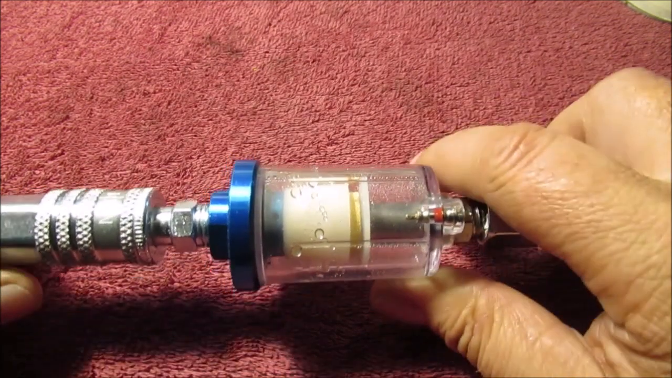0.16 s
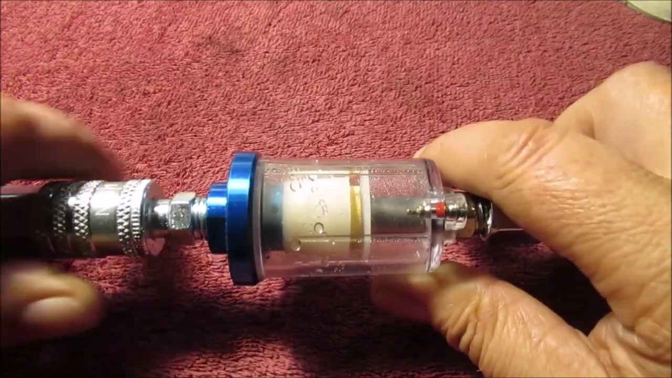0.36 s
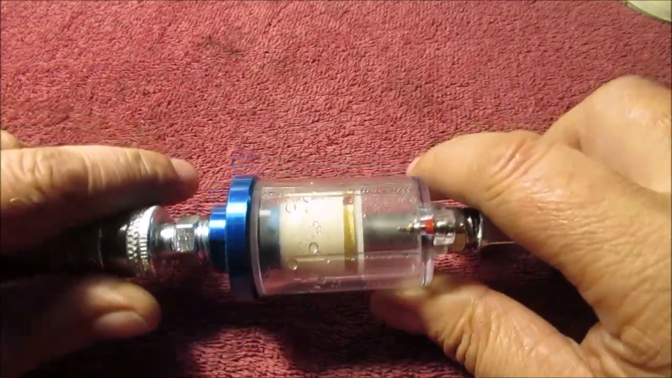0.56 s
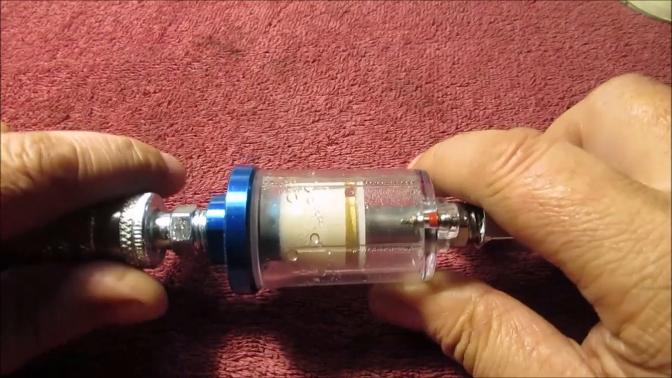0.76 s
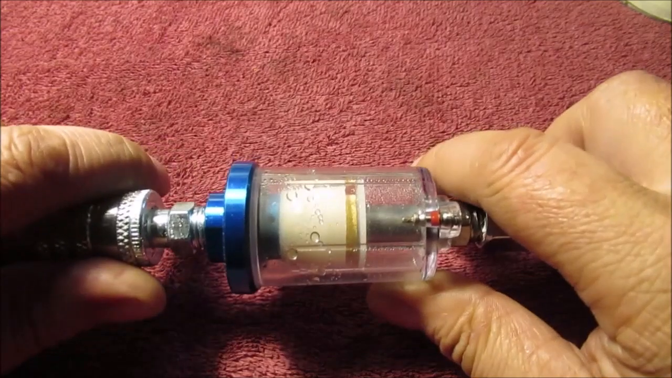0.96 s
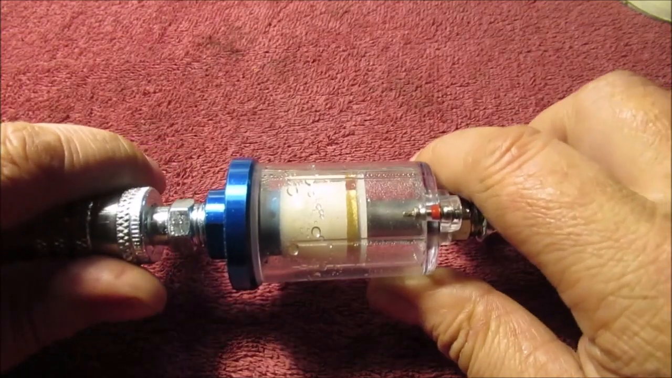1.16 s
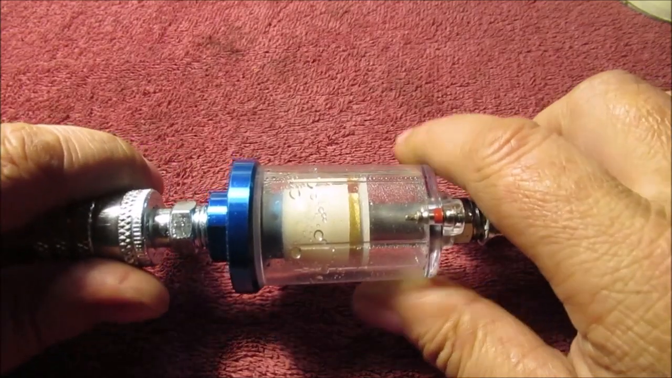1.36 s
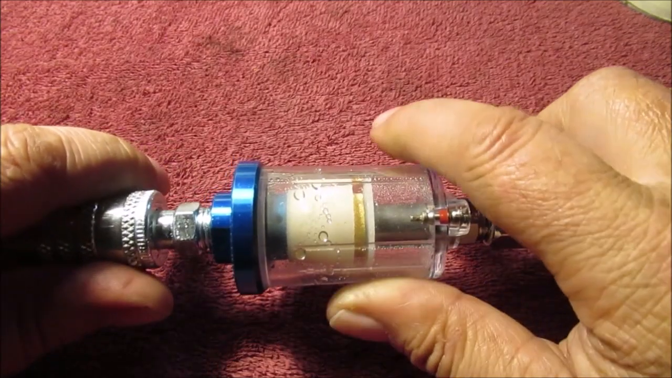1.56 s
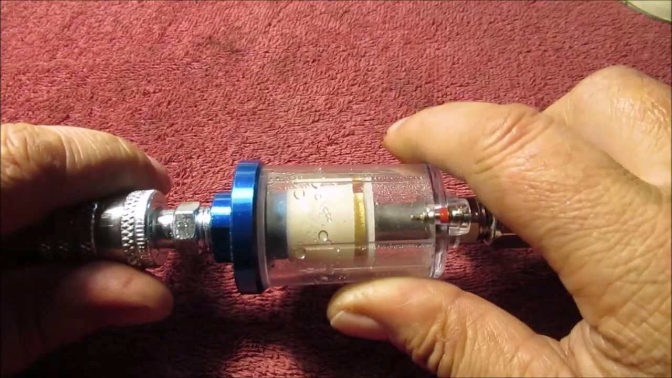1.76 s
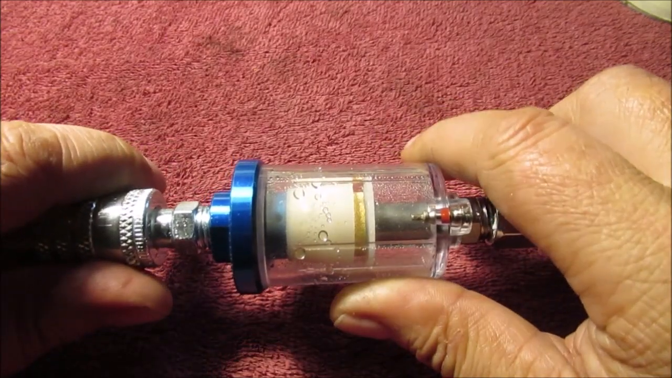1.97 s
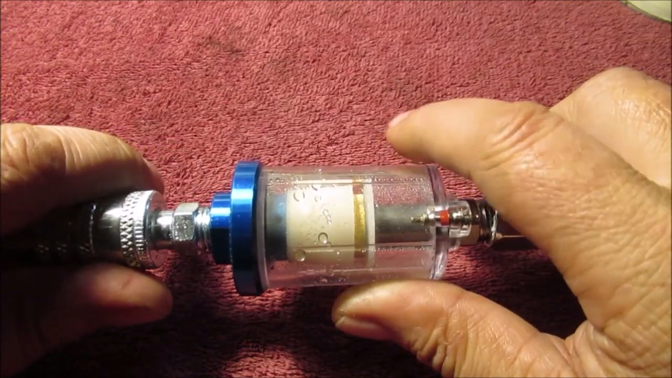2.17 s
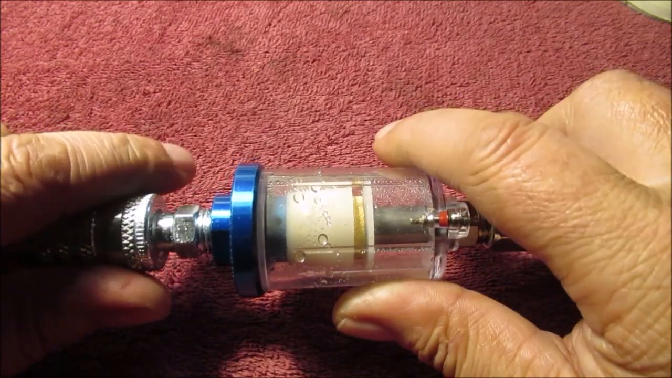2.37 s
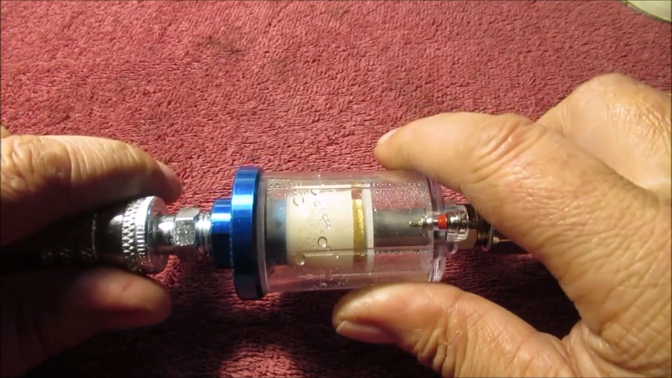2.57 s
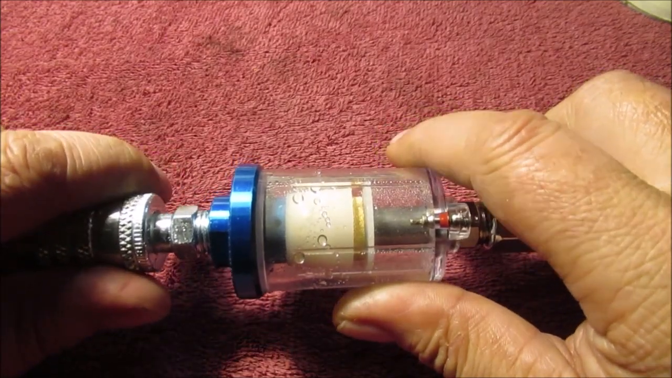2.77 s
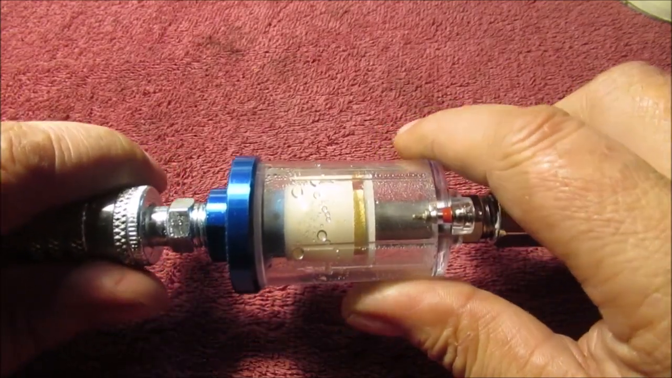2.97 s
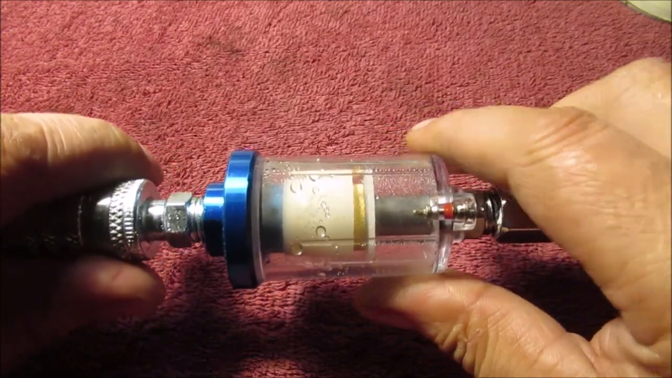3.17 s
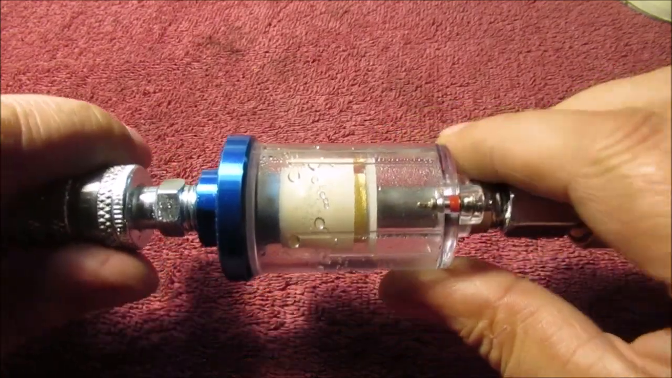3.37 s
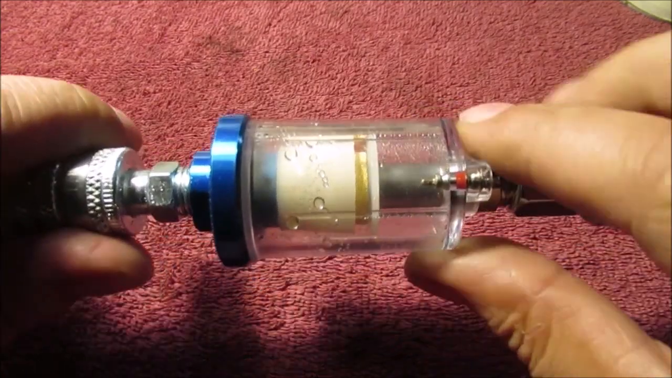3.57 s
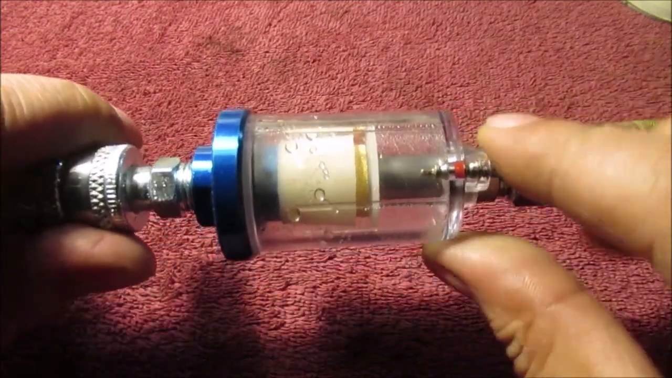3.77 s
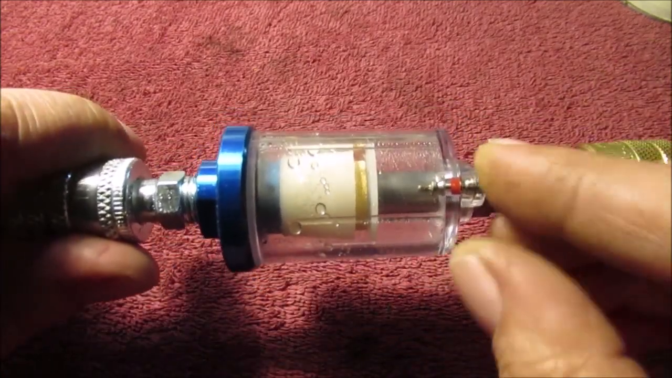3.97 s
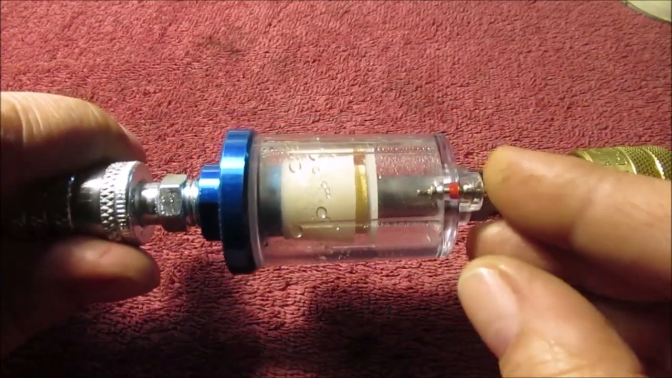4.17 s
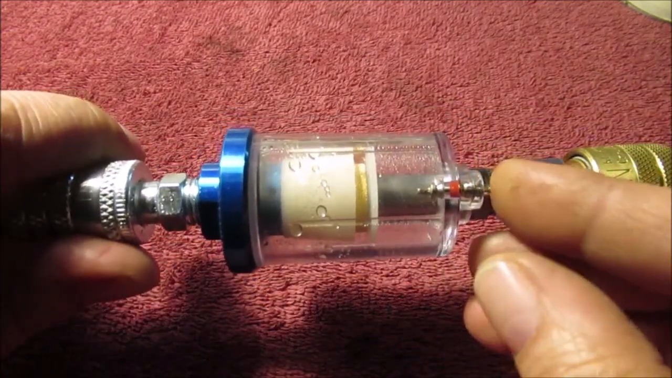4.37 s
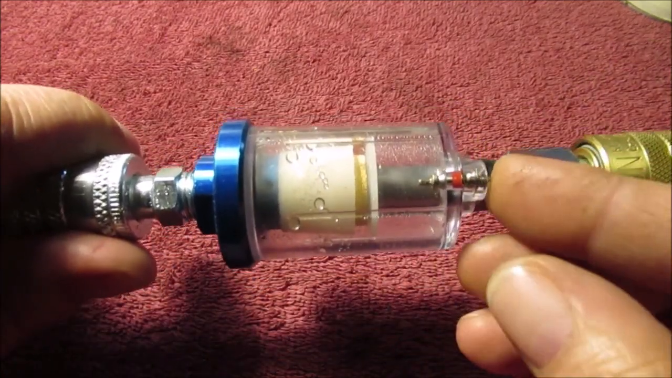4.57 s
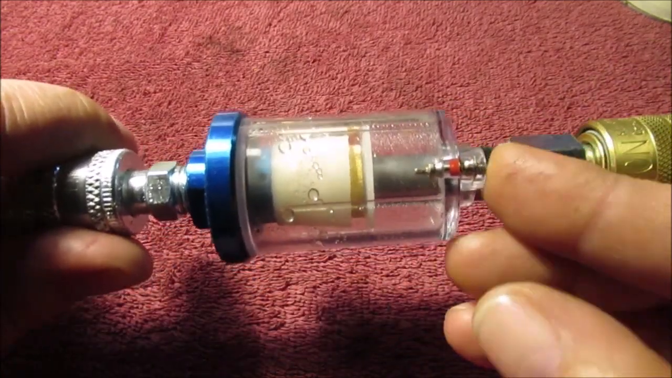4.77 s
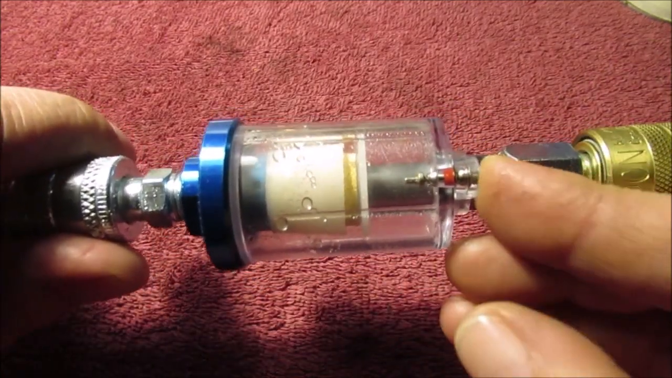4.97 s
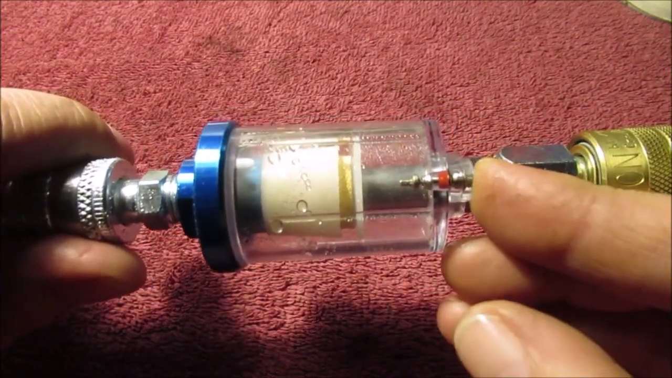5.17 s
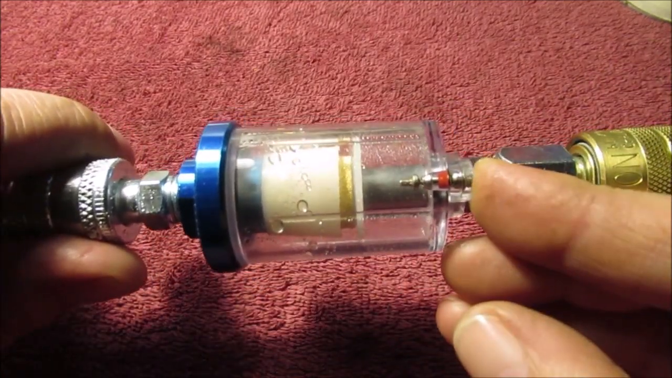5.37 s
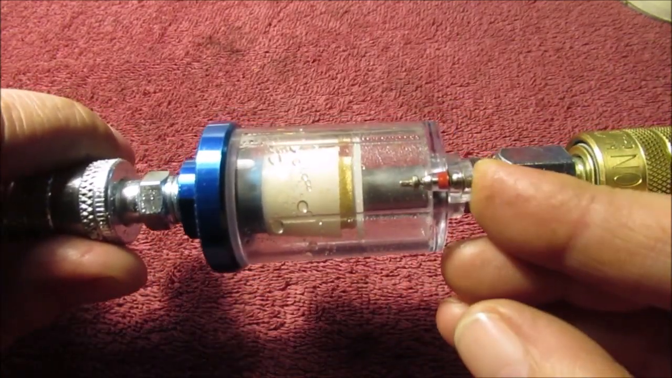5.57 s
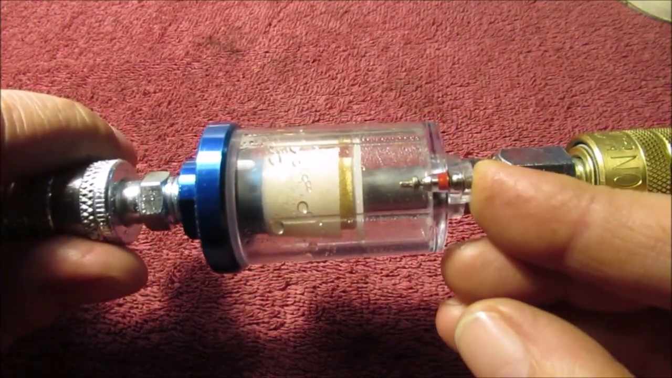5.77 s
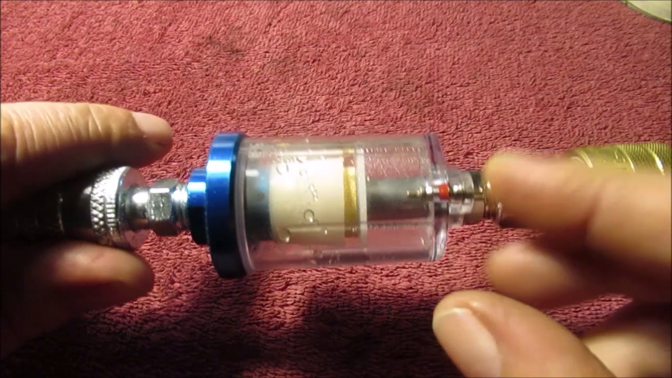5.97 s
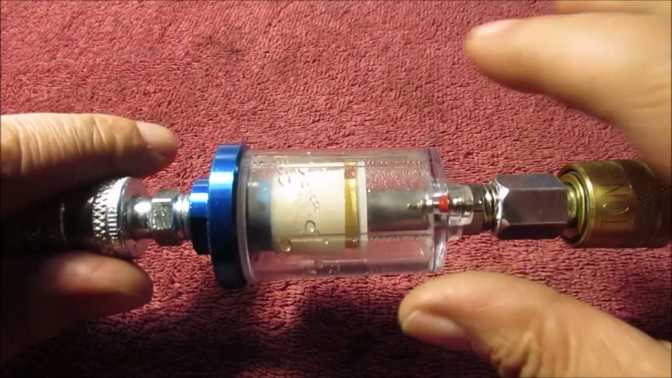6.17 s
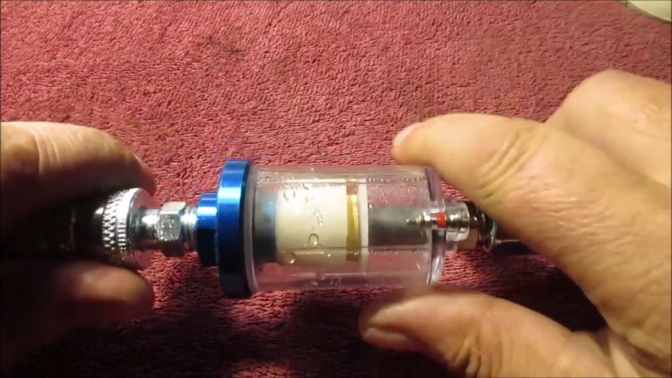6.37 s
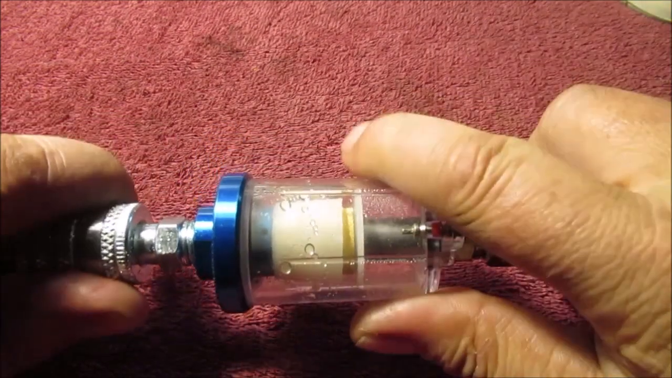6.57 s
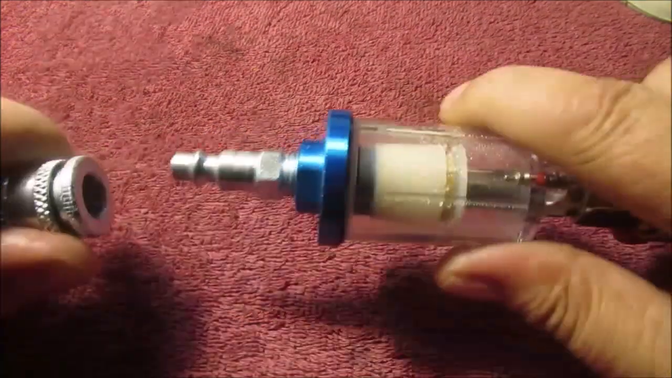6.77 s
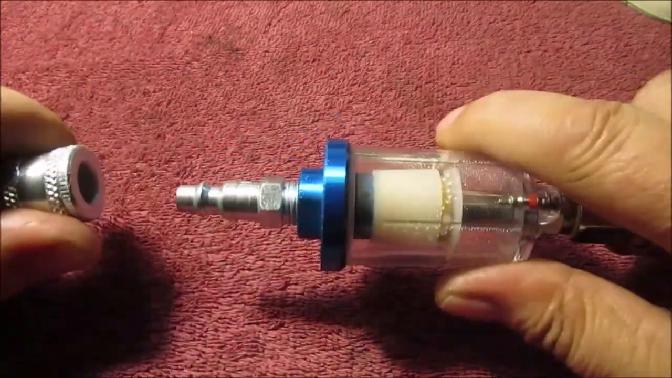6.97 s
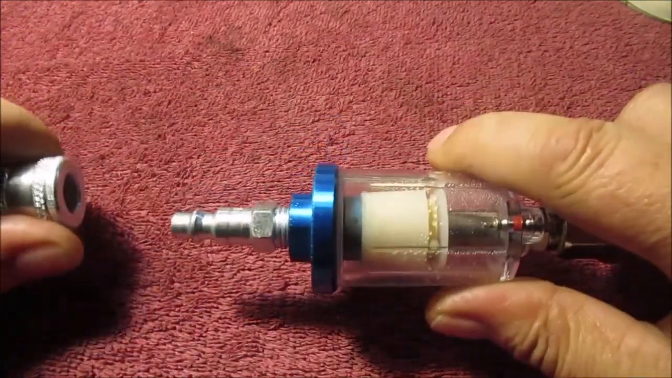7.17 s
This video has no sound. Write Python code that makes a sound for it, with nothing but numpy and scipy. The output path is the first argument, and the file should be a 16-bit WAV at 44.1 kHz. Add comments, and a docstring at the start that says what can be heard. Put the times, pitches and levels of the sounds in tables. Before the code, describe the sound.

Over a running workshop compressor, two loud close blasts of air: a sputtering valve hiss, then a coupling popping loose with a rush.

```python
"""Workshop compressor and two air blasts

A small piston compressor drones on: knocking strokes, gulps of air, a slapping reed valve, a rattling shroud.
Up close, a finger holds an air-line filter's drain open for a second and it spits air and water; then the
hose coupling pops off and air rushes out. The camera's gain control ducks under each blast and creeps back.
Now and then the hiss breaks off for an instant, and thin tones and chirps ring in the gap."""
import sys
import numpy as np
from scipy import signal
from scipy.fft import rfft, irfft
from scipy.io import wavfile
from scipy.ndimage import uniform_filter1d

SR = 44100
rng = np.random.default_rng(int(sys.argv[2]) if len(sys.argv) > 2 else 0)


def unload_wav(signal):
    """Save mono or channel-first audio to the path in sys.argv[1] as 16-bit WAV at rate SR, clipped to [-1, 1]."""
    wavfile.write(
        sys.argv[1],
        SR,
        np.round(np.clip(np.atleast_2d(signal).T, -1, 1) * 32767).astype(np.int16),
    )


N = 318843
T = np.arange(N) / SR
FREQS = np.maximum(np.fft.rfftfreq(N, 1 / SR), 1)


def undb(db):
    """Decibels to gain."""
    return 10 ** (np.asarray(db) / 20)


def unit(x):
    """Scale to rms 1."""
    return x / np.sqrt(np.mean(x ** 2))


def walk(rate):
    """A smooth random wobble of rms 1 that moves about rate times a second."""
    step = max(int(SR / rate), 2)
    held = np.repeat(rng.standard_normal(N // step + 1), step)
    return unit(uniform_filter1d(uniform_filter1d(held, step), step)[:N])


def noise(colour):
    """Noise of rms 1, shaped by (frequency [Hz], level [dB]) points."""
    hz, db = np.transpose(colour)
    curve = undb(np.interp(np.log(FREQS), np.log(hz), db))
    return unit(irfft(rfft(rng.standard_normal(N)) * curve, N))


def resonate(x, modes):
    """Ring a bank of (frequency [Hz], width [Hz], level [dB]) resonances; the result has rms 1."""
    response = sum(undb(db) / (1 + 1j * (FREQS ** 2 - hz ** 2) / (FREQS * width))
                   for hz, width, db in modes)
    return unit(irfft(rfft(x) * response, N))


def bump(s, length, t=T):
    """A flat-topped swell from 0 to 1 and back, centred on s."""
    return np.exp(-np.square(np.square(2 * (t - s) / length)))


def swells(rows):
    """A level ride in dB, summed from (time [s], length [s], level [dB]) swells."""
    return sum(db * bump(s, length) for s, length, db in rows)


def walls(x, echo_db, decay_s):
    """Dense reflections off bench and walls give noise a fine, slightly metallic grain."""
    age = np.arange(SR // 5) / SR
    tail = rng.standard_normal(len(age)) * np.exp(-age / decay_s)
    echoes = signal.fftconvolve(x, tail / np.linalg.norm(tail))[:N]
    return unit(x + undb(echo_db) * echoes)


def intake(turns):
    """The pump gulps air once a turn: a pulsing breath, reflected around the room."""
    # colour of the intake air and pump rattle: (frequency [Hz], relative level [dB])
    colour = [(25, -34), (70, -15.5), (140, -9), (240, 1), (290, -0.5), (420, -1), (850, -2), (1100, -8),
              (1550, -8.5), (2200, -14), (2700, -14), (3300, -17), (4300, -18.5), (5300, -21), (7500, -22),
              (9500, -25.5), (15000, -31)]
    gulp = (1 + .15 * np.cos(2 * np.pi * (turns - .15))) * undb(.7 * walk(27))
    return walls(noise(colour), echo_db=-10.5, decay_s=0.019) * gulp


def shroud(turns, decay_turns=0.96):
    """A clack on every turn, over a steady rattle, rings the cylinder head and shroud."""
    # rings of the metal: (frequency [Hz], width [Hz], relative level [dB])
    modes = [(2375, 37, 0), (2630, 400, -4), (3390, 76, -5), (4380, 60, -3), (4560, 87, -4), (4830, 97, -9),
             (5630, 54, -4.5), (6860, 70, -8), (7700, 70, -7), (8320, 110, -11), (9400, 50, -19),
             (13400, 450, -16), (14000, 50, -14)]
    clacks = (1 + np.exp(-(turns % 1) / decay_turns)) * rng.standard_normal(N)
    return resonate(clacks, modes)


def piston(turns, scatter=0.11, dispersion=.003, waver_db=0.88, jitter_turns=0.00054):
    """Each turn sends the same knocks through the casing; the walls scatter and sway their partials."""
    # tone of a stroke through the casing: (multiple of the stroke rate, relative level [dB])
    partials = [(1, -27), (2, -8.5), (3, -0.3), (4, -6.5), (5, -8.5), (6, -5.5), (7, -3), (8, -12),
                (9, 3.5), (10, -7), (11, 3.5), (12, -15.5), (13, -13), (14, -5), (15, -13.5), (16, 1),
                (17, -6.5), (18, -16), (19, -26), (20, -16), (21, -20.5), (22, -11.5), (23, -26), (24, -20),
                (25, -20), (26, -14), (27, -33), (28, -14.5), (29, -15.5), (30, -29), (31, -36), (32, -21),
                (33, -30), (34, -13.5), (35, -36), (36, -28), (37, -19), (38, -44), (39, -29.5), (40, -43),
                (41, -17.5), (42, -29), (43, -22.5), (44, -33), (45, -33), (46, -25), (47, -27)]
    # knocks of piston and valves, which set each partial's phase: (position [turns], signed pressure)
    knocks = [(0, -1), (.093, .9), (.283, -.55), (.373, -.49)]
    # one partial swells or fades: (time [s], length [s], multiple of the stroke rate, change [dB])
    wavers = [(1.25, 0.7, 6, -22), (1.5, 1.2, 7, 3), (2.044, 0.34, 6, 2.5), (3.5, 2, 3, 1.5),
              (1.762, 1.67, 5, 7.5), (1.8, 1, 3, -0.5), (2.39, 0.27, 6, -19), (3.5, 1.8, 5, -9),
              (4.0, 2.2, 12, -5.5), (6.349, 0.98, 6, -10), (6.4, 1.5, 5, 6), (6.399, 1.2, 7, 4)]
    turns = turns + jitter_turns * walk(58)  # no two strokes are quite the same length
    tone = 0
    for k, partial_db in partials:
        knock_phase = np.angle(sum(push * np.exp(-2j * np.pi * k * at) for at, push in knocks))
        lag = dispersion * k ** 2  # high partials arrive later and smear each knock
        stray = scatter * (k / 10) ** 2 * rng.standard_normal()  # short waves scatter most
        phase = 2 * np.pi * k * turns + knock_phase - lag + stray
        swell_db = swells((s, length, db) for s, length, multiple, db in wavers if multiple == k)
        tone = tone + undb(partial_db + swell_db + waver_db * walk(16)) * np.cos(phase)
    return unit(tone)


def reed_slaps(turns, uneven_db=3, late_turns=0.048):
    """The reed valve slaps shut just after each turn's main knock, never twice with the same force."""
    # ring of the reed: (frequency [Hz], width [Hz], relative level [dB])
    modes = [(2610, 590, 0), (4450, 900, -15)]
    shuts = np.diff(np.floor(turns - late_turns), prepend=-1) > 0
    slaps = shuts * undb(uneven_db * walk(58))
    return resonate(resonate(slaps, modes), modes)


def compressor(stroke_hz=57.8, wander=0.000983, level_db=-14.5):
    """The drone: one speed and one load, with air and rattle tucked under the piston tone."""
    turns = np.cumsum(stroke_hz * (1 + wander * walk(4))) / SR
    breath = undb(-11.5) * intake(turns)
    rattle = undb(-23) * shroud(turns)
    tone = piston(turns)
    uneven_db = .5 * walk(40)
    slaps = undb(-28.5) * reed_slaps(turns)
    return (tone + breath + rattle + slaps) * undb(level_db + uneven_db)


def thin_tones(s, length, t, count=7, low_hz=4800, top_hz=14800, outlast_s=.01, stagger_s=.004):
    """A handful of unrelated high tones around one gap, each coming and going at its own moment."""
    place, phase, stagger = rng.random((count, 3)).T
    pitches = low_hz * (top_hz / low_hz) ** ((np.arange(count) + place) / count)
    swell = bump(s + stagger_s * (2 * stagger - 1), length + outlast_s, t[:, None])
    tones = np.sin(2 * np.pi * (np.outer(t, pitches) + phase))
    return (swell * tones).sum(axis=1) * np.sqrt(2 / count)


def hiss_gaps(x, shoulder_db=-3.5, shoulder_s=.016):
    """The hiss drops out for an instant inside a wider, shallow sag; thin tones ring through the gap."""
    # gaps: (time [s], length [s], depth [dB], lower edge [Hz], tones relative to the hiss [dB])
    gaps = [(0.563, .007, -10, 2800, -16), (1.034, .009, -18, 2800, -20), (1.161, .009, -11, 2800, -16),
            (1.439, .009, -18, 2400, -20), (1.545, .044, -38, 2000, -30), (1.77, .024, -35, 2600, -30),
            (1.866, .007, -11, 2600, -18), (2.015, .012, -9, 1800, -10), (2.428, .025, -35, 1700, -28),
            (2.569, .007, -13, 2600, -16), (2.633, .007, -10, 2600, -16), (3.014, .024, -28, 1800, -18),
            (3.06, .007, -12, 2600, -16), (4.255, .007, -15, 2300, -20), (4.362, .007, -15, 2300, -12),
            (4.53, .006, -11, 2600, -16), (4.642, .007, -11, 2400, -14), (4.982, .006, -2, 3000, -2),
            (5.153, .011, -14, 700, -8), (5.291, .025, -30, 500, -9), (5.396, .024, -32, 600, -13),
            (5.47, .009, -13, 40, -8), (5.589, .021, -27, 100, -6), (5.662, .009, -13, 40, -7),
            (6.089, .01, -10, 2400, -30), (6.342, .007, -12, 2400, -20), (6.815, .008, -13, 150, -5),
            (6.859, .009, -13, 150, -6), (6.922, .009, -13, 150, -7), (7.0105, .005, -9, 150, -20)]
    out, reach = x.copy(), SR // 16
    for s, length, depth_db, hz, tones_db in gaps:
        near = slice(int(s * SR) - reach, int(s * SR) + reach)
        t = T[near]
        hiss = signal.sosfiltfilt(signal.butter(3, hz, "high", fs=SR, output="sos"), out[near])
        gap_db = depth_db * bump(s, length, t) + shoulder_db * bump(s, length + shoulder_s, t)
        tones = thin_tones(s, length, t) * np.std(hiss) * undb(tones_db)
        out[near] += hiss * (undb(gap_db) - 1) + tones
    return out


def chirps():
    """Short, steady-pitched blips stand out where the hiss breaks off."""
    # blips: (time [s], length [s], pitch [Hz], peak level [dB])
    blips = [(1.545, .05, 2363, -38), (1.552, .042, 3278, -37), (3.014, .03, 2659, -37),
             (5.292, .04, 436, -26), (5.297, .03, 1800, -27), (5.294, .03, 3036, -29),
             (5.392, .03, 785, -28), (5.399, .036, 2239, -28), (5.394, .028, 1862, -28),
             (5.47, .022, 1378, -24), (5.592, .036, 516, -26), (5.59, .028, 1227, -29),
             (5.582, .036, 2120, -28), (5.595, .032, 3316, -29), (6.815, .032, 1006, -23),
             (6.813, .026, 2912, -26), (6.858, .03, 1200, -22), (6.858, .024, 3294, -25),
             (6.922, .03, 931, -25)]
    out, reach = np.zeros(N), SR // 16
    for s, length, hz, db in blips:
        near = slice(int(s * SR) - reach, int(s * SR) + reach)
        tone = np.sin(2 * np.pi * (hz * T[near] + rng.random()))
        out[near] += undb(db) * bump(s, length, T[near]) * tone
    return out


def jet(hiss_colour, rumble_colour, rumble_db, flutter_db, eddy_db):
    """Air shears out of a narrow opening as hiss; larger eddies tumble beneath it."""
    hiss = noise(hiss_colour) * undb(flutter_db * walk(70))
    rumble = noise(rumble_colour) * undb(rumble_db + eddy_db * walk(90))
    return hiss + rumble


def opening(age, attack_s):
    """The flow builds from 0 to 1 as a port opens."""
    return np.square(1 - np.exp(-age / attack_s))


def shutting(s, cut_s=0.0042, tail_db=-7.5, tail_s=0.018):
    """The flow is cut off and leaves a short tail."""
    since = np.maximum(T - s, 0)
    return np.maximum(np.exp(-since / cut_s), undb(tail_db) * np.exp(-since / tail_s))


def drain(opens_s=4.973, shuts_s=6.016, level_db=3.0, calm_db_per_s=7, sag_db_per_s=0.4):
    """The held drain blows as the pressure sags; its rumble spurts, then calms as the water clears."""
    # colours of the jet's hiss and rumble: (frequency [Hz], relative level [dB])
    hiss_colour = [(30, -18), (200, -7.5), (900, -2.5), (2000, -3), (3000, -4.5), (4300, -7), (6000, -4.5),
                   (8200, -4.5), (10500, -5), (13500, -4), (15000, -9.5)]
    rumble_colour = [(25, -21), (70, -2), (170, -0.5), (400, 0), (700, -7), (1500, -20), (4000, -26)]
    # slugs of water burble out: (time [s], length [s], rumble lift [dB])
    spurts = [(5.0, 0.02, 5), (5.165, 0.048, 6), (5.31, 0.041, 3.5), (5.44, 0.03, 4), (5.545, 0.022, 8),
              (5.625, 0.03, 4)]
    age = np.maximum(T - opens_s, 0)
    rumble_db = -13.5 - calm_db_per_s * age + swells(spurts)
    air = jet(hiss_colour, rumble_colour, rumble_db, flutter_db=1.42, eddy_db=4.0)
    flow = opening(age, attack_s=0.007) * shutting(shuts_s)
    return air * undb(level_db - sag_db_per_s * age) * flow


def pops():
    """A seal lets go or a drop is spat out: a burst of pressure a few milliseconds long."""
    # pops and spits of the valves: (time [s], level [dB], pitch [Hz], decay [s])
    hits = [(4.973, -16, 900, 0.0011), (4.979, -1, 2500, 0.0016), (4.9817, 9, 6400, 0.00088),
            (4.9874, 5, 1690, 0.0018), (5.544, 4, 503, 0.0025), (5.99, 10, 1400, 0.001),
            (5.991, 11, 450, 0.0019), (6.758, -6, 500, 0.0019), (6.768, 3, 7060, 0.0012),
            (6.769, 7.5, 259, 0.0024), (6.7714, 12, 1290, 0.00091)]
    out = np.zeros(N)
    age = np.arange(SR // 20) / SR
    for s, db, hz, decay in hits:
        burst = np.sin(2 * np.pi * hz * age) + 0.4 * rng.standard_normal(len(age))
        start = int(s * SR)
        out[start:start + len(age)] += undb(db) * burst * np.exp(-age / decay)
    return signal.sosfilt(signal.butter(2, 70, "high", fs=SR, output="sos"), out)


def hold(db, fall_db_per_s):
    """Follow every rise at once and fall back at a steady rate."""
    fall = fall_db_per_s * T
    return np.maximum.accumulate(db + fall) - fall


def gain_control(x, threshold_db=-21, sense_hz=4000, attack_s=0.0067, slow_share=0.53, quick_share=0.28):
    """Loud treble ducks the gain at once; part of it springs back, the rest creeps back."""
    treble = signal.sosfilt(signal.butter(1, sense_hz, "high", fs=SR, output="sos"), x)
    pole = np.exp(-1 / (attack_s * SR))
    power = signal.lfilter([1 - pole], [1, -pole], treble ** 2)
    over_db = np.maximum(10 * np.log10(power + 1e-12) - threshold_db, 0)
    duck_db = slow_share * hold(over_db, 9.0) + quick_share * hold(over_db, 600)
    return x * undb(-duck_db)


def hose(opens_s=6.758, level_db=2.0, swell_db_per_s=11, gust_share=0.22):
    """Air rushes from the freed plug, louder as the coupling moves clear; gusts lift the rumble most."""
    # colours of the jet's hiss and rumble: (frequency [Hz], relative level [dB])
    hiss_colour = [(30, -24), (200, -26), (1000, 2.5), (1700, -1), (2600, 0), (3700, -3), (5800, -1.5),
                   (9500, -3.5), (12800, -5), (15000, -8)]
    rumble_colour = [(25, -24), (90, -13), (250, -4), (400, -5), (600, -0.5), (900, -9), (1800, -10),
                     (5000, -18.5)]
    # the jet swings at the microphone and buffets it: (time [s], length [s], rumble lift [dB])
    gusts = [(6.769, 0.012, 4), (6.89, 0.023, 3), (6.975, 0.065, 6), (7.098, 0.16, 11), (7.185, 0.023, 5.5)]
    age = np.maximum(T - opens_s, 0)
    gust_db = swells(gusts)
    rumble_db = -8.5 + (1 - gust_share) * gust_db
    air = jet(hiss_colour, rumble_colour, rumble_db, flutter_db=1.3, eddy_db=1.4)
    ride_db = level_db + swell_db_per_s * age + gust_share * gust_db
    return air * undb(ride_db) * opening(age, attack_s=0.0076)


def scene():
    """The compressor runs on under both blasts, everything dead centre."""
    return np.tile(compressor() + drain() + hose() + pops(), (2, 1))


def record(dry, ceiling=.82, top_hz=15050):
    """The mono camera chain: ride the gain, add gaps and chirps, clip the peaks, cut the top."""
    ducked = gain_control(dry.mean(axis=0))
    clipped = np.clip(hiss_gaps(ducked) + chirps(), -ceiling, ceiling)
    high_cut = signal.ellip(12, .2, 90, top_hz, fs=SR, output="sos")
    return np.tile(signal.sosfilt(high_cut, clipped), (2, 1))


dry = scene()
out = record(dry)
unload_wav(out)
```